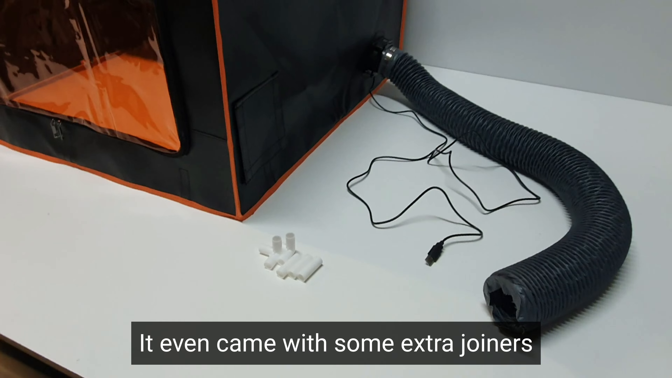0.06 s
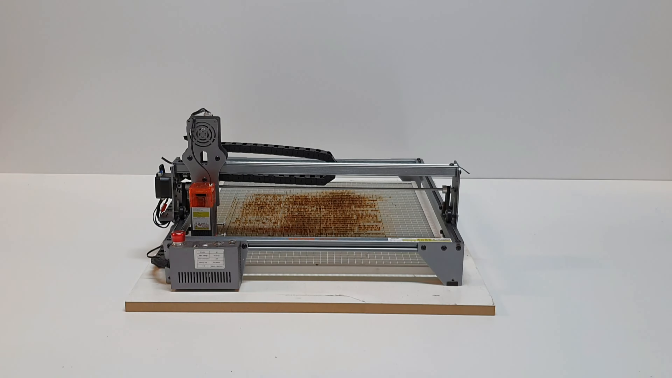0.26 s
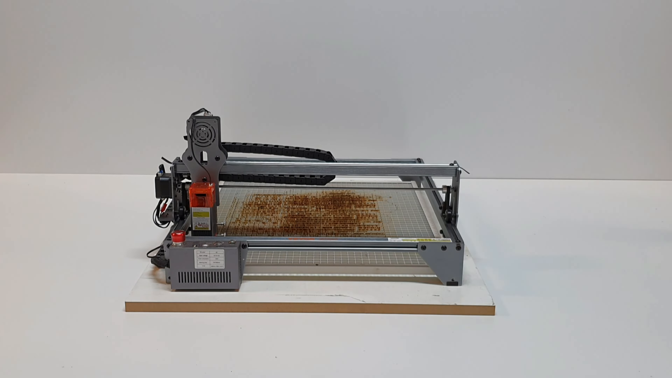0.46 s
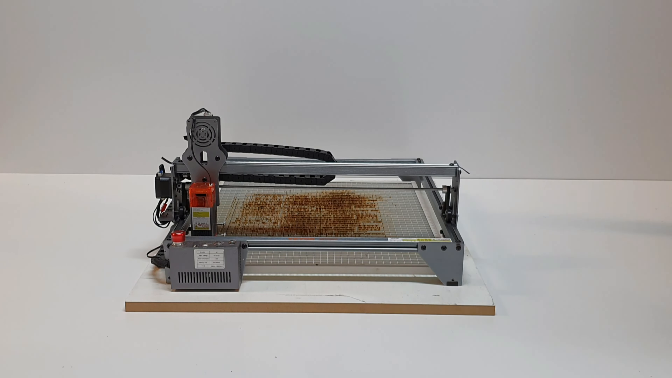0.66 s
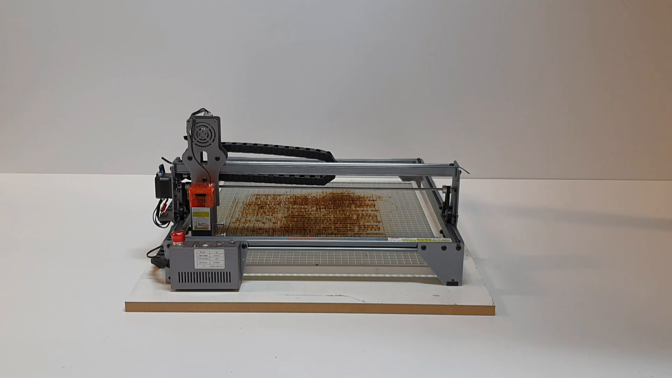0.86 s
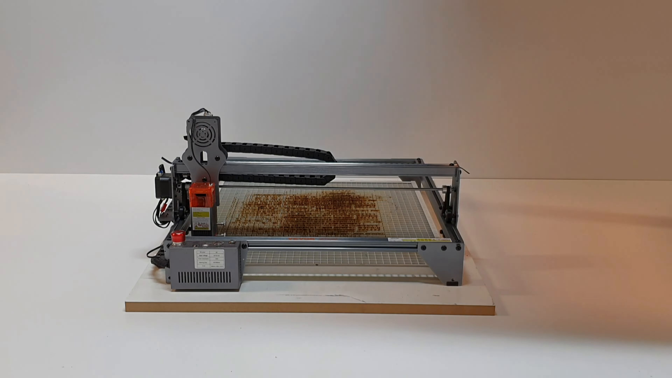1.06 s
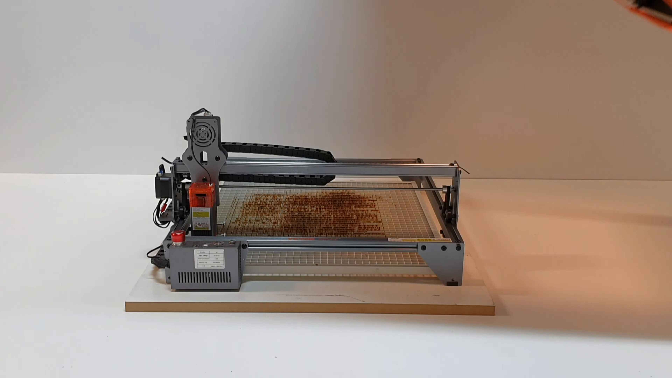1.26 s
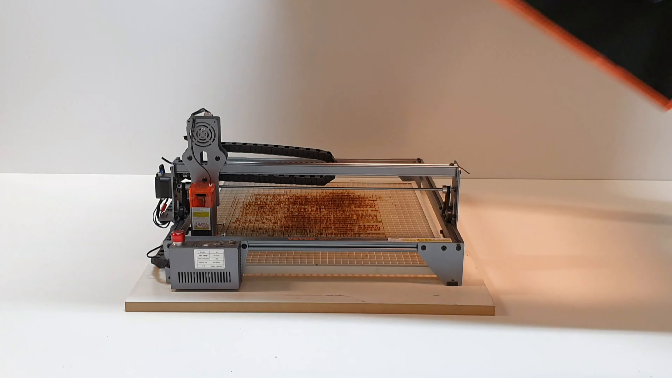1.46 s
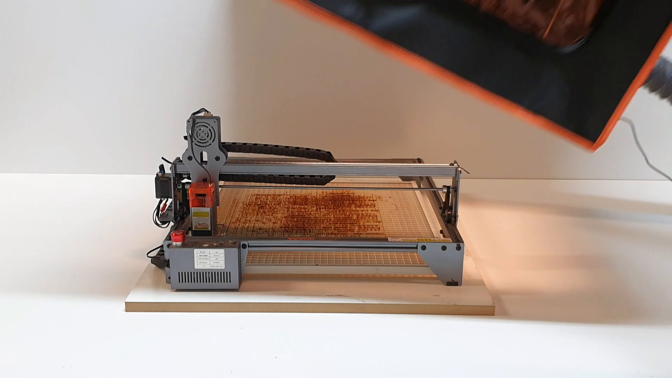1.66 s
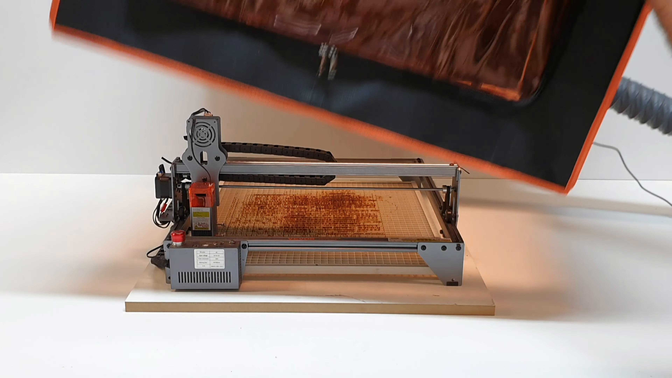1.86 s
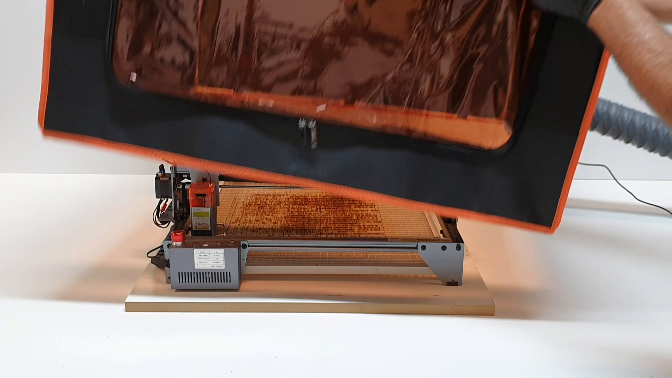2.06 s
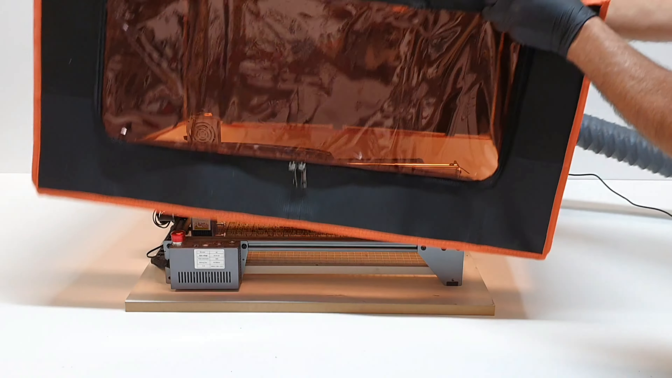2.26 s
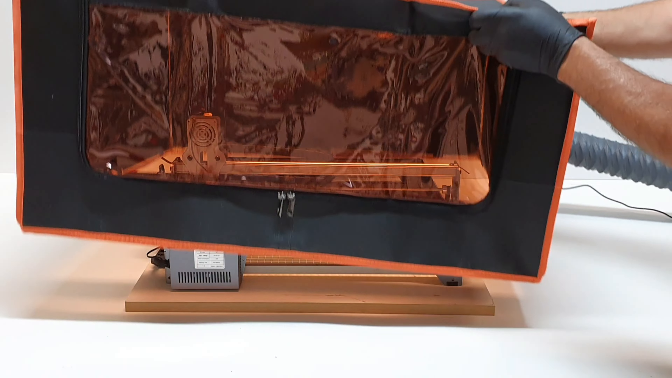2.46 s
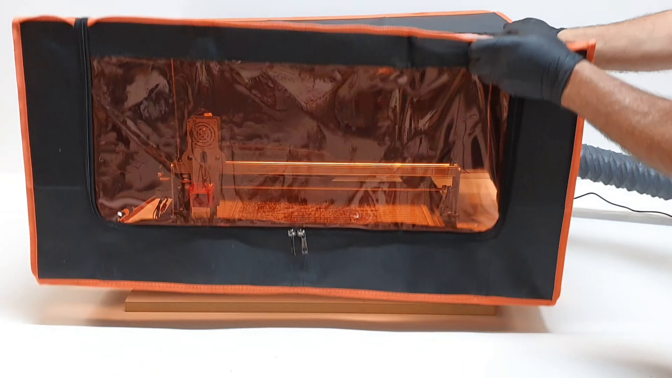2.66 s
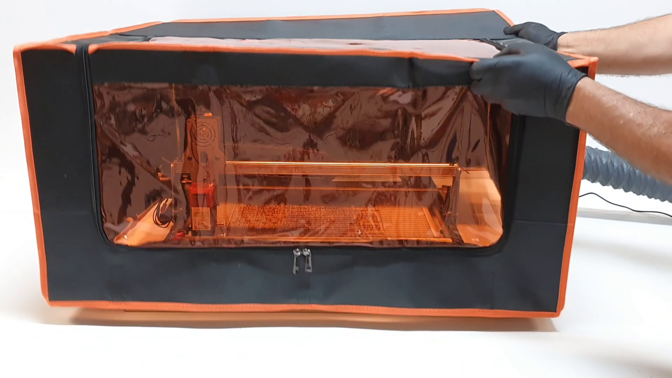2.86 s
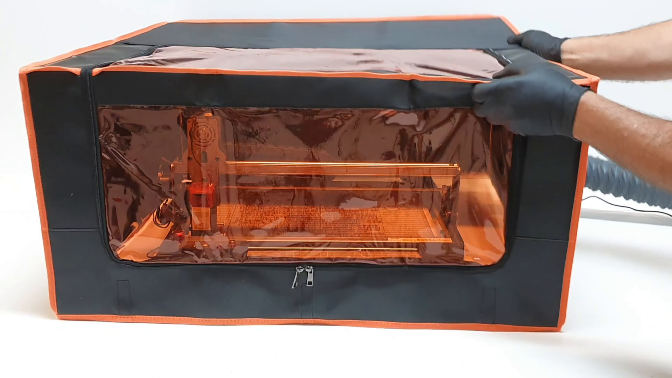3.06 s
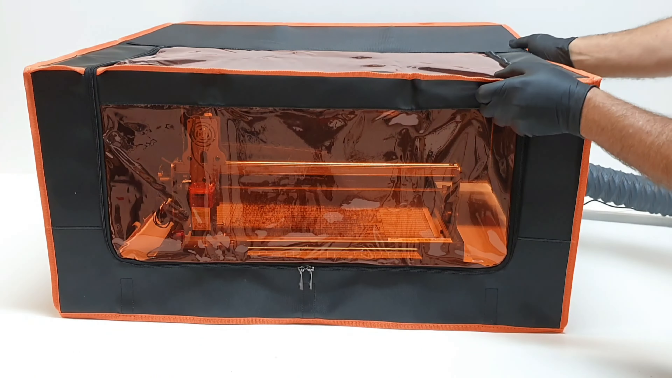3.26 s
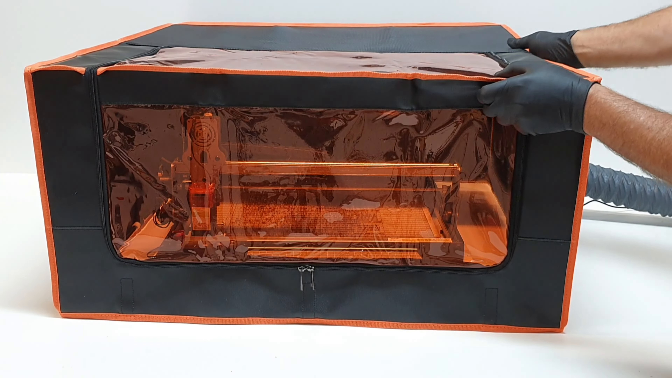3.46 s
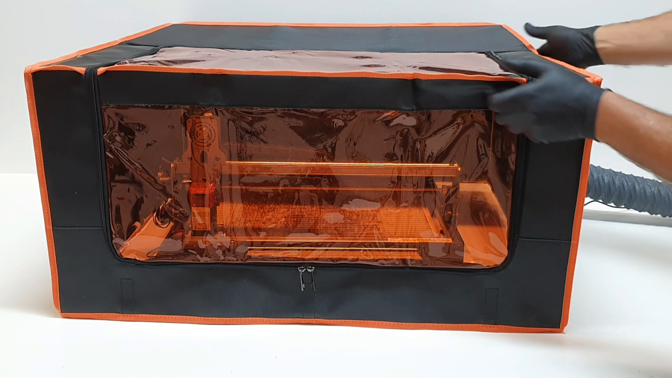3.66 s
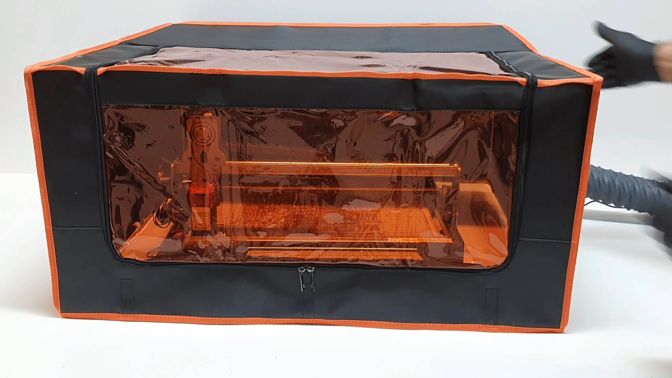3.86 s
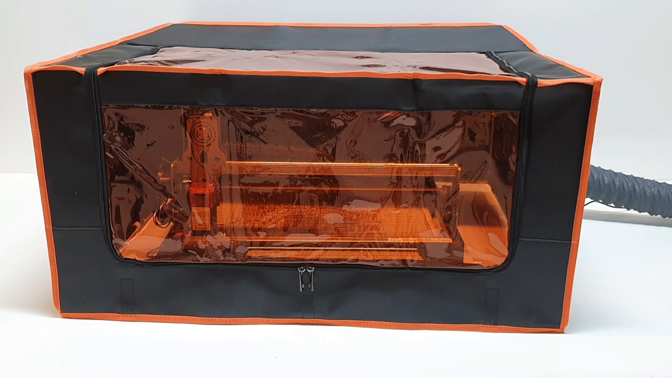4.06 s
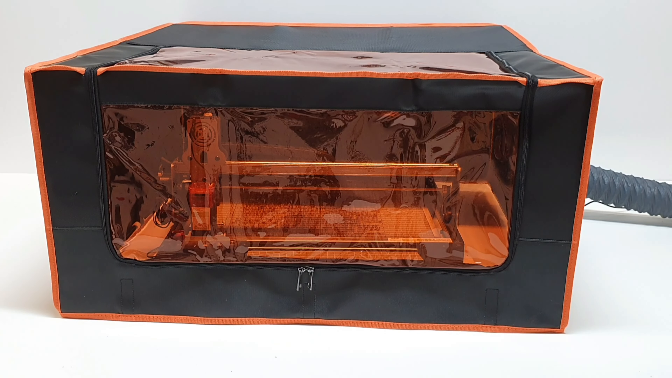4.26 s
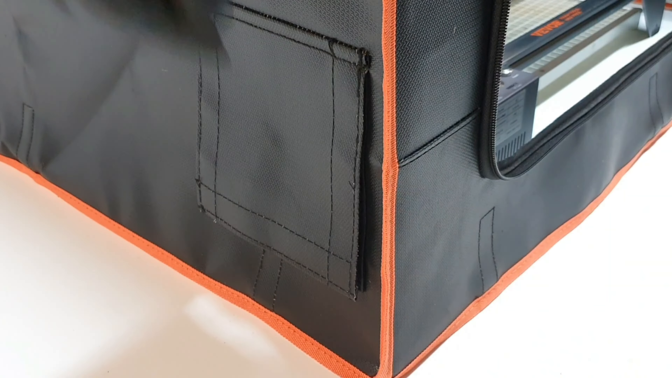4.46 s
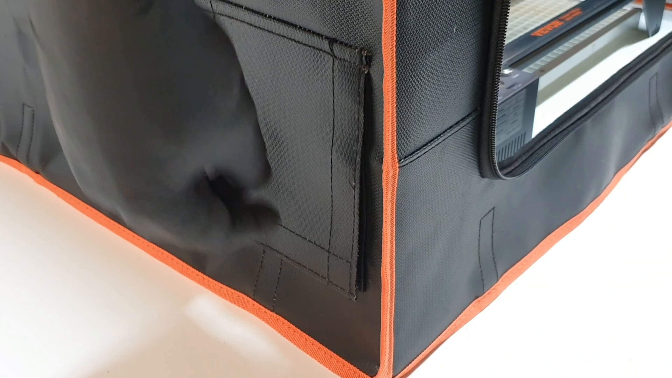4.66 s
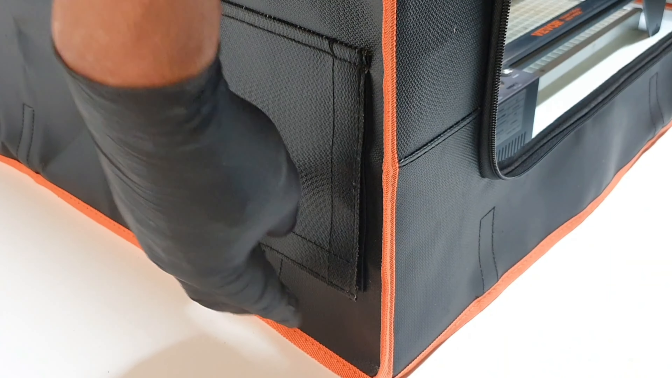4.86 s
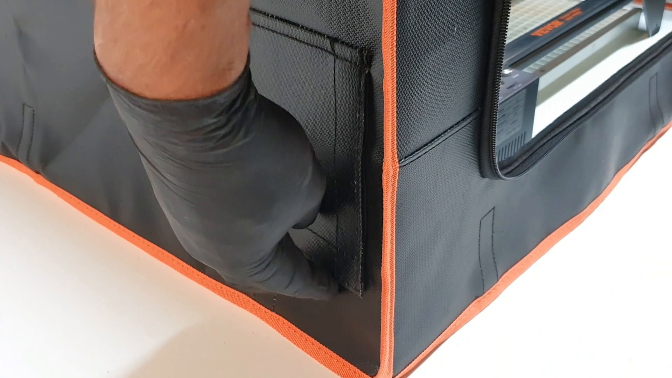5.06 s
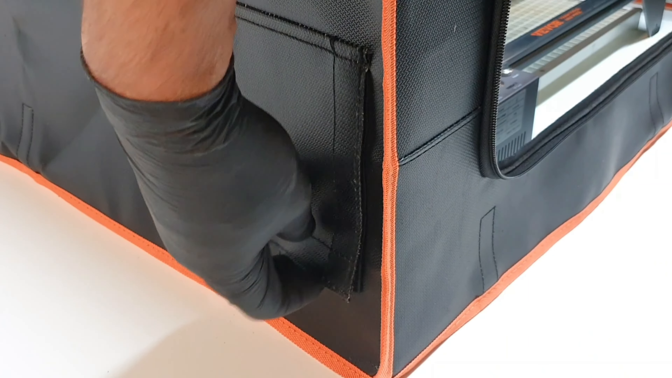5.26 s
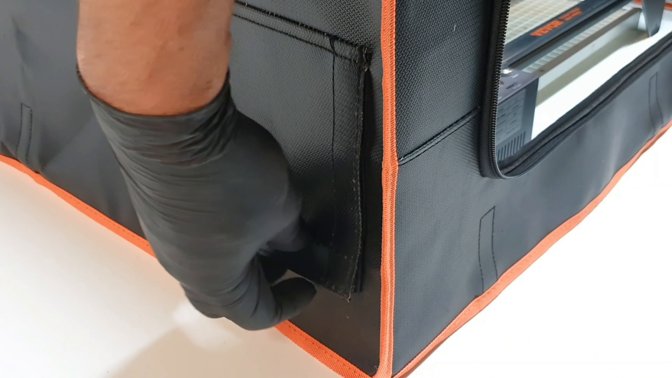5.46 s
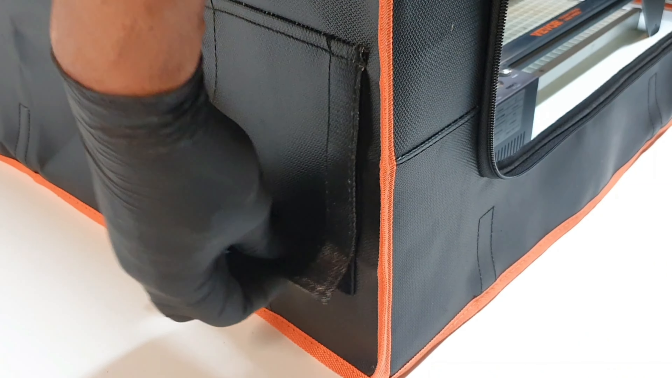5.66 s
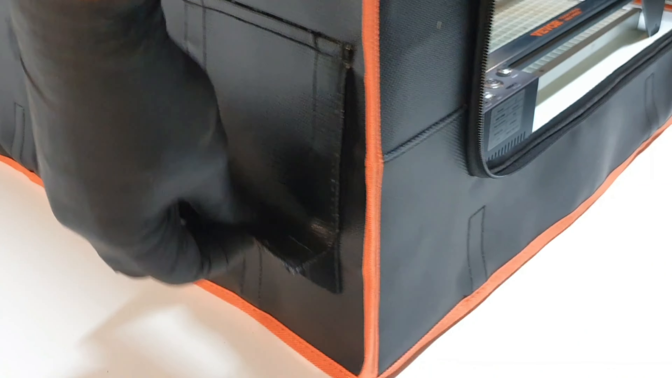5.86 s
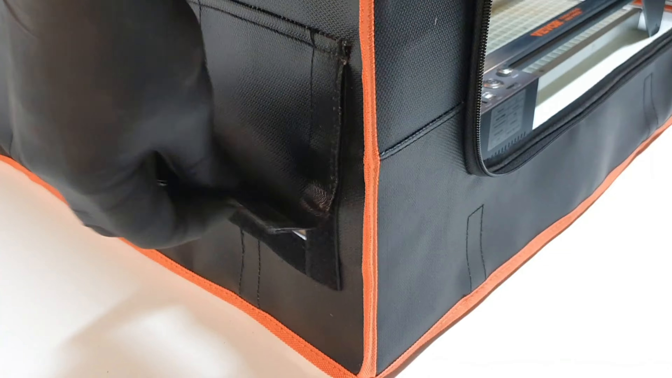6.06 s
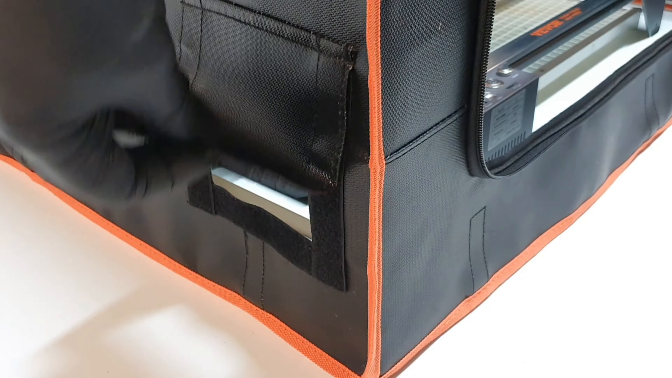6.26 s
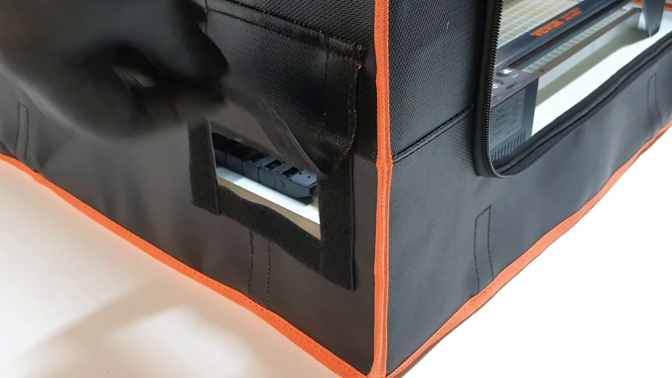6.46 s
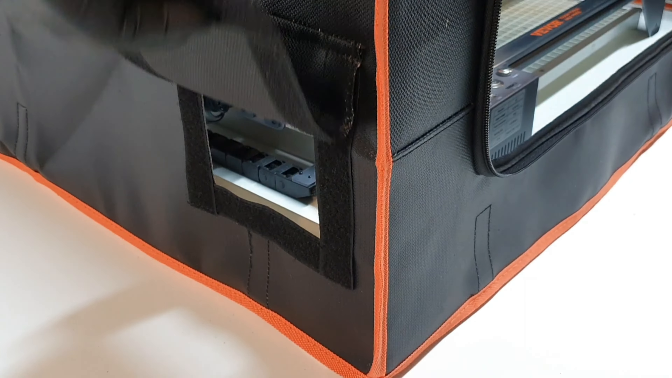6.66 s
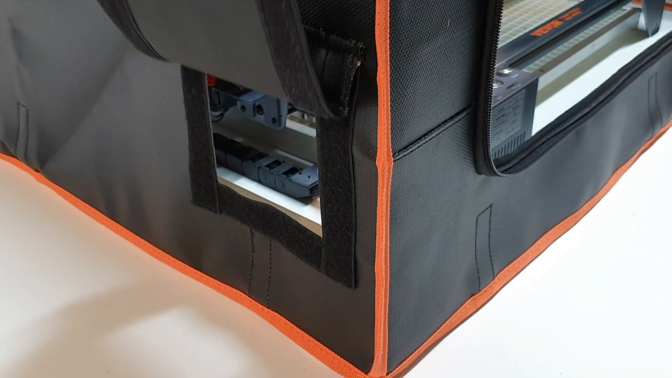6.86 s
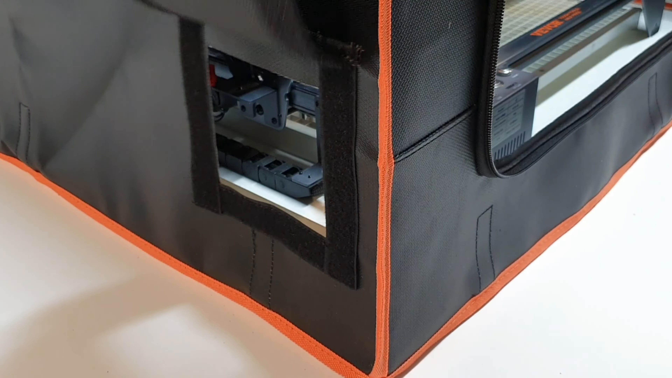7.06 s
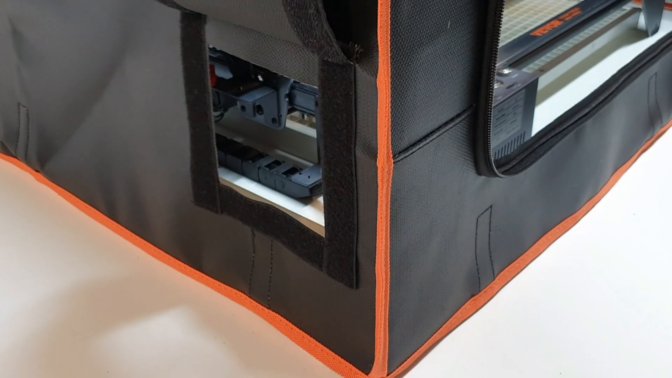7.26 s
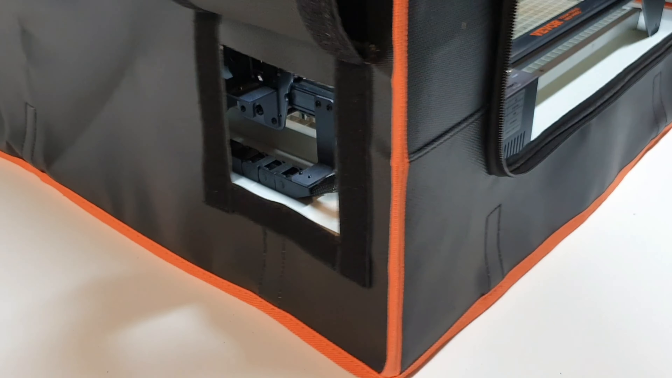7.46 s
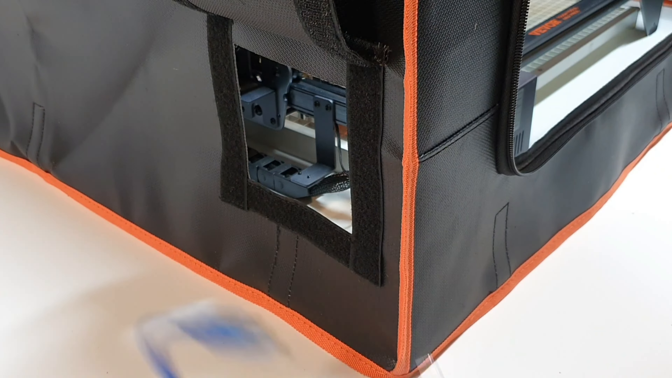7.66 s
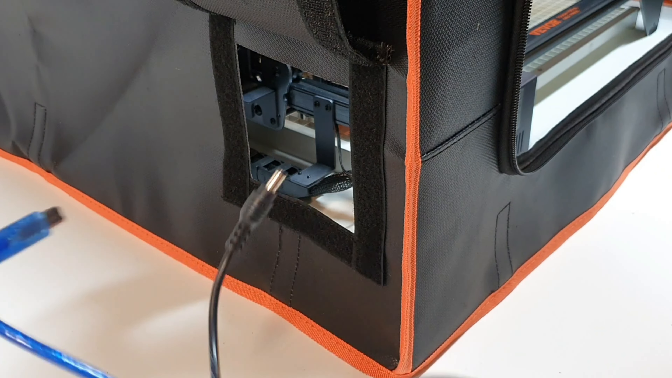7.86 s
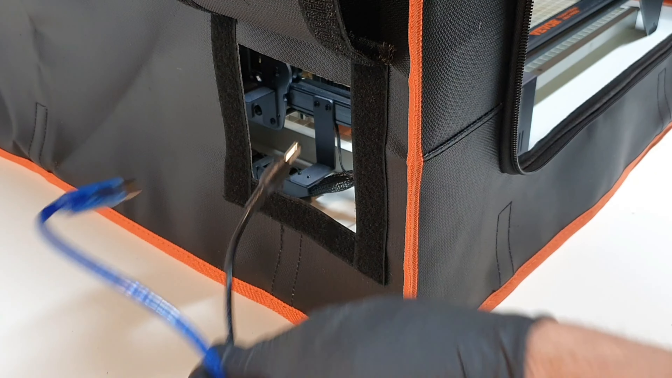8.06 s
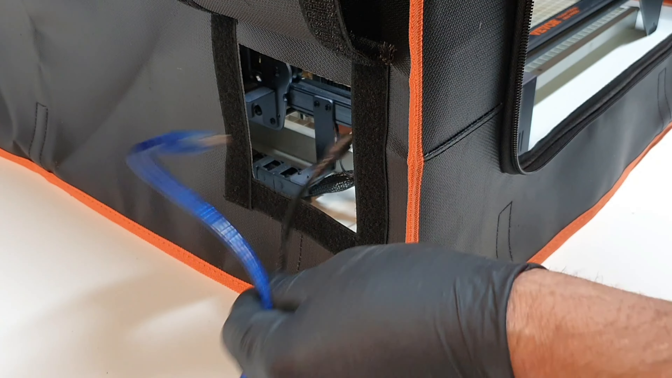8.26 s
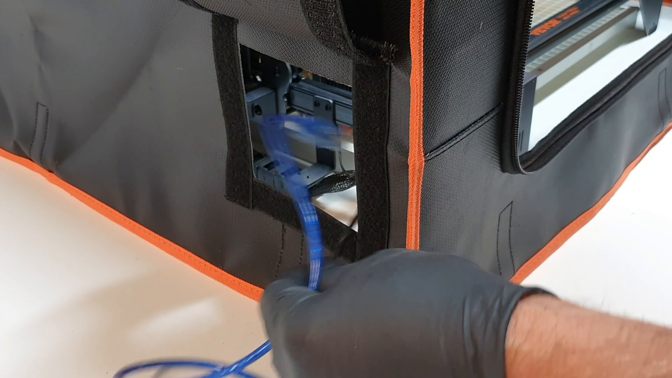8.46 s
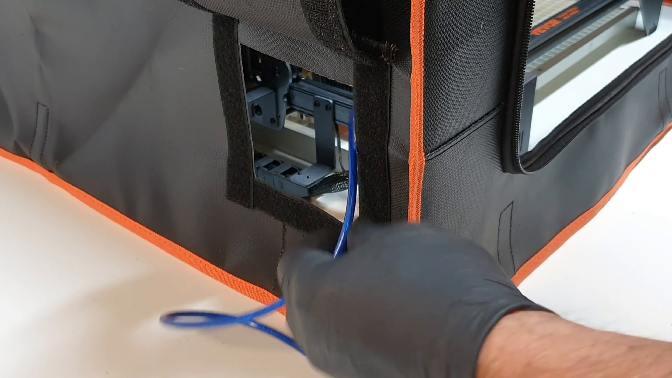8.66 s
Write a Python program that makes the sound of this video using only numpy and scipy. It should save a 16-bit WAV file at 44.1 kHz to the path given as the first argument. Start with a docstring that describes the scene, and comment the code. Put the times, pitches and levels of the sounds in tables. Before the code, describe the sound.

A stiff cloth cover knocks and scuffs quietly into place, a fastened flap tears open in a harsh crackling rip, then cables rub a table.

```python
"""A thin tone over room rumble comes first, then the rustle and knocks of a fabric hood and ribbed hose.
The hood is lifted over a machine and set on a table; a gloved hand peels a hook-and-loop flap; cables slide.
Slipping hooks are short noise bursts, struck parts are decaying modes, and rubbing is flickering noise.
A small quiet room adds a diffuse tail, all heard by a pair of close microphone ports."""
import sys
import numpy as np
from scipy import signal
from scipy.io import wavfile
from scipy.ndimage import uniform_filter1d

SR = 44100
rng = np.random.default_rng(int(sys.argv[2]) if len(sys.argv) > 2 else 0)


def dump(signal):
    """Clip the signal to [-1, 1] and save it as 16-bit WAV at the path in sys.argv[1]."""
    limited = np.clip(np.atleast_2d(signal).T, -1, 1)
    pcm = np.round(limited * 32767).astype(np.int16)
    wavfile.write(sys.argv[1], SR, pcm)


N = 384111

# Large snaps of hooks letting go. Each row: start in seconds, crack level in dB,
# panel thud setting in dB relative to the crack (both shifted by fixed trims).
LARGE_SNAPS = [(5.162, -46, 0), (5.366, -30.5, -9), (5.3958, -25, -8), (5.5177, -23.5, -6.5),
               (5.618, -32, -26), (5.65, -33, -2.5), (5.6628, -6.5, -2), (5.668, -17.5, -2.5),
               (5.6725, -20, -12), (5.6887, -21.5, 3.5), (5.704, -6.5, -1), (5.709, -16, -3.5),
               (5.717, -19, -19), (5.774, -8.5, -19.5), (5.78, -12, 3.5), (5.797, -11, -16),
               (5.817, -16.5, -18.5), (5.8197, -12.5, -2), (5.8284, -14.5, 1), (5.841, -12, -21.5),
               (5.8795, -13.5, -9), (5.8842, -10.5, -1), (5.908, -23, 2.5), (5.9202, -13.5, -10.5),
               (5.994, -19, -10), (6.007, -20.5, -11), (6.011, -13, -23), (6.0196, -13, -1),
               (6.028, -13, 7), (6.035, -16.5, 8.5), (6.0481, -14.5, 0.5), (6.063, -8, -9),
               (6.09, -8.5, -1), (6.109, -11.5, -1.5), (6.121, -16.5, -3.5), (6.1562, -9, -6.5),
               (6.1732, -18, 3.5), (6.1808, -14.5, -1.5), (6.1955, -11.5, 0), (6.2265, -6, -8.5),
               (6.243, -8.5, -3), (6.27, -18, -2), (6.2995, -11, -3), (6.334, -23, -2), (6.3433, -13, -4),
               (6.3576, -9, -1.5), (6.425, -13, -6.5), (6.448, -16, -10.5), (6.498, -22, -12),
               (6.51, -13.5, -14), (6.5182, -15, 0.5), (6.525, -14, -5.5), (6.5631, -7, -17.5),
               (6.575, -14, -5), (6.594, -9, -7), (6.624, -18.5, -29), (6.6466, -10, -8),
               (6.6861, -15, -16), (6.7058, -7, -14.5), (6.743, -11, -33.5), (6.7569, -10, -5.5),
               (6.7788, -19.5, -9.5), (6.7979, -13, -10), (6.8072, -15.5, -13), (6.8189, -10, -7),
               (6.8376, -16.5, 1), (6.842, -10, -9), (6.875, -15, -16.5), (6.885, -14.5, -6),
               (6.9075, -18, -6), (6.9142, -12.5, -9.5), (6.928, -9, -9.5), (6.9501, -12.5, -23.5),
               (6.958, -16, -4.5), (6.9882, -12, -6.5), (6.995, -21, -7.5), (7.0008, -16, -7.5),
               (7.0256, -7.5, -6), (7.0555, -5, -9), (7.077, -11.5, -29), (7.092, -15.5, -18.5),
               (7.137, -21, -26), (7.1476, -10.5, -21), (7.1551, -17, -28), (7.1812, -16, -48)]
# Strokes of cloth on cloth. Each row: start in seconds, hold in seconds, scuff level in dB,
# hiss level in dB, low push level in dB, pitch of the weave in Hz.
CLOTH_STROKES = [(0.154, 0.048, -59.5, -60.5, -91, 1540), (0.401, 0.011, -59, -59.5, -61.5, 2410),
                 (0.504, 0.0094, -53.5, -65, -50.5, 2060), (0.56, 0.1, -57, -61, -55.5, 2040),
                 (0.719, 0.16, -48, -54.5, -46, 1870), (0.969, 0.17, -56, -61, -58.5, 2140),
                 (1.212, 0.034, -62, -68, -57.5, 690), (1.347, 0.13, -54, -59.5, -53, 1700),
                 (1.488, 0.25, -56, -62.5, -54.5, 1300), (2.086, 0.084, -55.5, -53, -45, 2090),
                 (2.262, 0.078, -55, -66, -46.5, 1160), (2.47, 0.02, -57.5, -59.5, -58, 1990),
                 (2.748, 0.068, -59, -67.5, -48.5, 920), (3.01, 0.089, -56.5, -79, -58, 796),
                 (3.066, 0.046, -48.5, -61, -48, 1060), (3.216, 0.053, -54.5, -57.5, -43, 1420),
                 (3.373, 0.027, -66.5, -73, -57, 1520), (4.074, 0.03, -66, -60.5, -87, 1920),
                 (4.338, 0.048, -64, -60, -80, 2000), (4.482, 0.026, -76, -69, -65, 1730),
                 (4.751, 0.02, -61.5, -67.5, -83, 940), (5.125, 0.033, -69, -66, -57, 1000),
                 (5.217, 0.037, -66, -68.5, -61, 895), (5.345, 0.23, -61.5, -63, -56, 1440)]
# Spectrum of scuffed cloth. Each row: frequency in Hz, relative level in dB per Hz.
SCUFF_SPECTRUM = [(300, -23.5), (520, -5), (900, -1), (1450, -1), (1900, 2), (3800, -11), (7000, -53)]
# Spectrum of the fine hiss of cloth. Each row: frequency in Hz, relative level in dB per Hz.
HISS_SPECTRUM = [(1800, -14), (3200, -13.5), (6500, -6.5), (8800, -20), (12500, -15)]
# Coherence of the two ports. Each row: frequency in Hz, left-right likeness from -1 to 1.
LIKENESS = [(60, 0.92), (180, 1), (550, 0.67), (1650, 0.13), (4970, -0.11), (15000, -0.068)]


def gain_of(db):
    """The decibel law: amplitude ratio of a level in dB."""
    return 10 ** (np.asarray(db) / 20)


def evened(x):
    """Normalization to unit root-mean-square."""
    return x / np.sqrt(np.mean(x ** 2) + 1e-20)


def peaked(x):
    """Normalization to unit peak."""
    return x / abs(x).max()


def read(points, hz):
    """Interpolation along a logarithmic frequency axis."""
    f, value = np.transpose(points)
    return np.interp(np.log(hz + 1), np.log(f + 1), value)


def curves(rows):
    """Linear interpolation of the columns over time; -200 outside the rows."""
    s, *columns = np.transpose(rows)
    return [np.interp(np.arange(N) / SR, s, c, left=-200, right=-200) for c in columns]


def add(mix, s, sound, pan_db, lead):
    """Level and arrival-time differences place a sound; the left port hears it lead samples early."""
    for port, side in enumerate((1, -1)):
        first = round(s * SR - side * lead / 2)
        part = mix[port, first:][:len(sound)]
        part += gain_of(side * pan_db / 2) * sound[:len(part)]


def coloured(x, spectrum):
    """Minimum-phase filtering: the phase is the Hilbert transform of the log gain."""
    log_gain = np.log(gain_of(read(spectrum, abs(np.fft.fftfreq(4096, 1 / SR)))))
    response = np.exp(log_gain - 1j * signal.hilbert(log_gain).imag)
    taps = np.fft.ifft(response).real[:2048]
    taps = taps[None] / np.linalg.norm(taps)
    return signal.oaconvolve(np.atleast_2d(x), taps, axes=1)[:, :np.shape(x)[-1]]


def rings(modes, phases, detune=1, size=8000):
    """Modal synthesis: a sum of damped sines, each falling 60 dB in its t60; phases in turns."""
    t = np.arange(size) / SR
    total = 0
    for (hz, db, t60), phase in zip(modes, phases):
        total = total + gain_of(db - 60 * t / t60) * np.sin(2 * np.pi * (hz * detune * t + phase))
    return total


def following(x, hz, width_hz):
    """Heterodyne resonator: shifts the curve hz to zero, low-passes, and shifts back."""
    turn = np.exp(2j * np.pi * np.cumsum(hz) / SR)
    pole = np.exp(-np.pi * width_hz / SR)
    return evened((turn * signal.lfilter([1 - pole], [1, -pole], x / turn)).real)


def woven(x, hz, width_hz, db):
    """Texture pitch: a broad resonance along the curve hz is added to the noise."""
    return evened(x + gain_of(db) * following(x, hz, width_hz))


def noise(spectrum, patchy_db, flicker_db):
    """Random short-time spectra with drifting patches and a flicker shared by all pitches."""
    frames, hz = N // 128 + 9, np.fft.rfftfreq(512, 1 / SR)
    a, b, c, d, patches = rng.standard_normal((frames, 257, 5)).T
    patches = uniform_filter1d(patches, size=6, axis=0)
    patches = evened(uniform_filter1d(patches, size=16, axis=1))
    flicker = evened(uniform_filter1d(rng.standard_normal(frames), size=3))
    same = np.clip(read(LIKENESS, hz), -1, 1)[:, None]
    left = a + 1j * b
    right = same * left + np.sqrt(1 - same ** 2) * (c + 1j * d)
    level_db = read(spectrum, hz)[:, None] + patchy_db * patches + flicker_db * flicker
    z = np.array([left, right]) * gain_of(level_db)
    return evened(signal.istft(z, nperseg=512, noverlap=384)[1][:, :N])


def peeling():
    """Stick-slip release: large snaps, each amid a crackle that swells faintly before it and dies after it."""
    # Tension of the flap, which rings higher when taut.
    # Each row: time in seconds, nominal pitch of its main mode in Hz.
    tautness = [(5.66, 468), (5.78, 294), (5.82, 422), (5.85, 310), (5.885, 603), (6.03, 600), (6.065, 760),
                (6.1, 824), (6.16, 620), (6.245, 494), (6.3, 534), (6.75, 545), (7.2, 469)]
    # Spectrum of the cracks. Each row: frequency in Hz, relative level in dB per Hz.
    crack_spectrum = [(180, -48), (300, -5.5), (567, -9), (923, -9.5), (1330, -5), (3650, -7.5),
                      (6560, -6.5), (8870, -16), (12200, -10.5), (15400, -14.5)]
    peel_start_s, full_run_s = 5.6, 0.45  # the first hooks go singly, then in runs
    base_slip_s, slip_growth = 0.0009, 0.84  # a louder crack is a longer run of hooks
    out, cracks, snaps = np.zeros((2, N)), np.zeros((2, N)), np.zeros(N)
    for s, db, thud_db in LARGE_SNAPS + followers():
        chance = rng.standard_normal(702)
        progress = min((s - peel_start_s) / full_run_s, 1)
        slip_s = np.clip(base_slip_s * progress * gain_of(slip_growth * (db + 12)), 0.00025, 0.003)
        still_held = 0.077 * np.exp(-max(s - 5.8, 0) / 1.0)
        taut_hz = np.interp(s, *np.transpose(tautness))
        crack, thud = snap(db + thud_db - 4.0, still_held, taut_hz, slip_s, chance[2:])
        add(cracks, s, gain_of(db + 5.0) * crack, 1.5 + 2.0 * chance[1], lead=4 + 1.6 * chance[0])
        add(out, s, thud, -0.4, lead=4)  # long waves reach both ports alike
        snaps[round(s * SR)] += gain_of(db)
    after = signal.lfilter([1], [1, -np.exp(-1 / (0.0026 * SR))], snaps)
    # a faint crackle swells just before each snap: a similar decay, reversed in time
    before = signal.lfilter([1], [1, -np.exp(-1 / (0.0024 * SR))], snaps[::-1])[::-1]
    hooks = gain_of(11.0 * np.minimum(rng.exponential(1, N), 1.3))
    hooks = hooks * (rng.random(N) < 1800 / SR) * rng.choice([-1, -1, 1], N)  # 1800 hooks a second
    delay = rng.integers(0, 9, N)
    late = np.zeros(N + 9)
    late[np.arange(N) + delay] = hooks  # each hook reaches the right port 0 to 8 samples later
    crackle = evened(coloured(np.array([hooks, 0.67 * late[:N]]), crack_spectrum))
    crackle_gain = gain_of(-13.5) * after + gain_of(-18.5) * before
    return out + coloured(cracks, crack_spectrum) + crackle_gain * crackle


def followers():
    """Secondary release: one further snap, always much weaker, at a chance delay after each large one."""
    wait, size, thud = rng.exponential(1, (len(LARGE_SNAPS), 3)).T
    s, db, _ = np.transpose(LARGE_SNAPS)
    return list(zip(s + 0.007 * (0.5 + wait), db - 10.5 + (1 - size), -11 + 3.5 * (1 - thud)))


def snap(thud_db, still_held, taut_hz, slip_s, chance):
    """Impulsive release: hooks slip within milliseconds; the flap recoils with a pull of air, barely ringing."""
    # Modes of the flap, all scaled by its tension.
    # Each row: nominal frequency in Hz, nominal level in dB, t60 in seconds.
    flap_modes = [(177, -13.5, 0.032), (490, -7, 0.013), (510, -4.5, 0.021), (696, -8, 0.013),
                  (990, -9.5, 0.005)]
    t = np.arange(2500) / SR
    slip_t = t[:len(chance)]
    slips = np.pad(chance * slip_t * np.exp(-slip_t / slip_s), (0, 300))
    dullness = np.clip(0.028 + 0.5 * chance[-9], 0, 0.85)  # each snap is dulled by a chance amount
    slips = signal.lfilter([1], [1, -dullness], slips)
    # each snap has a broad resonance at a chance pitch
    resonance_hz = np.clip(1700 * np.exp(0.5 * chance[-10]), 700, 9000)
    slips = slips + signal.lfilter(*signal.iirpeak(resonance_hz, 3.5, SR), slips)
    span = taut_hz / flap_modes[2][0] * np.exp(0.1 * chance[-1])
    modes = [(hz, db + 2.4 * c, t60) for (hz, db, t60), c in zip(flap_modes, chance[-8:])]
    thud = -rings(modes, np.zeros(len(flap_modes)), span, size=len(t))
    thud = peaked(signal.lfilter(*signal.butter(1, 150, "high", fs=SR), thud))
    wall_hz = 120 * np.exp(0.33 * chance[-2])  # a flap still held tugs the whole wall
    wall = -np.sin(2 * np.pi * wall_hz * t) * np.exp(-t / 0.0072)
    return slips / np.linalg.norm(slips), gain_of(thud_db) * (thud + still_held * wall)


def knocks():
    """Impact excitation: each bump crumples stiff cloth, rings the hood frame and thumps the panels."""
    # Hood, hose and cable bumping. Each row: start in seconds, crack level in dB, thump level
    # in dB over the crack, crumple level in dB over the crack, thump pitch in Hz.
    bumps = [(0.501, -31, -19, -12, 91.5), (0.586, -28.5, -11.5, -11.5, 96.9),
             (0.641, -29.5, -7, -8.5, 137), (0.715, -21.5, -41, -14, 484), (0.776, -24.5, -26, -14, 498),
             (0.792, -23.5, -10.5, -6, 300), (0.801, -28, -2.5, -8, 165), (0.842, -29, -24, -6.5, 527),
             (0.867, -23.5, -16, -31, 300), (0.878, -29.5, -2.5, -27, 195), (1.01, -26.5, -28, -5.5, 670),
             (1.041, -26.5, -8, -14, 320), (1.36, -26, -1, -12, 125), (1.483, -27, -1.5, -16, 88.8),
             (1.585, -22.5, -3, -22, 88.8), (1.645, -25, 0.5, -30, 100), (2.068, -34, -28, -10, 315),
             (2.103, -37, 1.5, -17, 343), (2.279, -23, -5, -13, 146), (2.297, -26, -2, -42, 83.4),
             (2.743, -43.5, 7, -11, 99.6), (2.806, -47.5, 13.5, -26, 188), (2.847, -42, 0, -7, 347),
             (3.094, -32, 6.5, -5.5, 170), (3.241, -29.5, 6.5, -11, 563), (3.664, -60, 1, -22, 96.9)]
    # Modes of the hood frame. Each row: nominal frequency in Hz, level in dB, t60 in seconds.
    hood_modes = [(1173, -1, 0.011), (1884, -2, 0.012), (2930, -12, 0.0062), (4500, -8, 0.0061)]
    # Modes of the panels. Each row: nominal frequency in Hz, nominal level in dB, t60 in seconds.
    panel_modes = [(98.3, -9, 0.16), (161.3, -1, 0.049), (351, 1.5, 0.035), (531.4, -5.5, 0.061),
                   (733, 3.5, 0.019)]
    out, t = np.zeros((2, N)), np.arange(6000) / SR
    for s, db, thump_db, crumple_db, thump_hz in bumps:
        a, b = rng.standard_normal((2, len(t)))
        chance = rng.random(20)
        blow = (np.exp(-t / 0.0054) + 0.98 * np.exp(-t / 0.0014)) * (1 - np.exp(-t / 0.0018))
        ring = rings(hood_modes, chance, 0.977 + 0.056 * chance[-1], size=len(t))
        ring = signal.oaconvolve(ring, a * blow)[:len(t)]
        # modes near the thump pitch are favoured, by 2.87 dB per octave
        near = [(hz, level - 2.87 * abs(np.log2(hz / thump_hz)), t60) for hz, level, t60 in panel_modes]
        thump = rings(near, 0.35 * chance[10:], 0.886 + 0.22 * chance[-2], size=len(t))
        thump = thump * (1 - np.exp(-t / 0.0011))
        body = 0.28 * peaked(ring) + 0.73 * peaked(coloured(b * blow, SCUFF_SPECTRUM)[0])
        crumple = gain_of(crumple_db) * peaked(coloured(a * blow, HISS_SPECTRUM)[0])
        bump = gain_of(db) * (body + crumple + gain_of(thump_db) * peaked(thump))
        add(out, s, bump, 2 - 6 * chance[-4], lead=-24 * chance[-3])
    return out


def zip_pulls():
    """Free vibration of small metal parts: zip pulls touch once and ring."""
    # Modes of the zip pulls. Each row: frequency in Hz, relative level in dB, t60 in seconds.
    zip_modes = [(6430, 3.5, 0.048), (12400, -2, 0.055), (14010, -11, 0.42)]
    out = np.zeros((2, N))
    add(out, 1.906, gain_of(-56) * rings(zip_modes, np.zeros(9)), 0, 0)
    return out


def touches():
    """Damped resonance after contact: a tick, then a few swings of whatever was tapped."""
    # Short dry taps of fingertips, hose ribs and plugs.
    # Each row: start in seconds, level in dB, main frequency in Hz, t60 in seconds.
    taps = [(2.657, -41.5, 1940, 0.017), (2.848, -32, 1110, 0.0082), (3.095, -27, 895, 0.016),
            (3.196, -27.5, 420, 0.016), (3.2474, -20, 630, 0.013), (4.333, -53, 640, .03),
            (4.762, -47.5, 933, 0.043), (5.013, -56, 1570, 0.038), (8.5648, -33.5, 348, 0.015),
            (8.689, -37, 516, 0.012), (8.6953, -31, 328, 0.012)]
    out, t = np.zeros((2, N)), np.arange(4000) / SR
    for s, db, hz, t60 in taps:
        modes = [(hz, 0, t60), (0.658 * hz, -6, t60), (1.7 * hz, -8, t60 / 2)]
        ring = -rings(modes, np.zeros(3), size=len(t))
        onset = np.minimum(t * hz / 0.35, 1)
        tick = coloured(rng.standard_normal(len(t)) * np.exp(-t / 0.00097), SCUFF_SPECTRUM)[0]
        add(out, s, gain_of(db) * (ring * onset + gain_of(-9.5) * peaked(tick)), 0, 0)
    return out


def rubbing():
    """Sliding friction: weave on weave gives scuff, fine hiss and low push; cables rub the table top."""
    # Cables sliding, with dips in level. Each row: time in seconds, level in dB, scrape pitch in Hz.
    cable_slide = [(7.45, -77, 1510), (7.54, -53.5, 1700), (7.665, -53, 1500), (7.7, -78, 1450),
                   (7.725, -53, 1390), (7.84, -43.5, 1550), (8.05, -53.5, 1410), (8.11, -44.5, 970),
                   (8.2, -45, 1370), (8.44, -53.5, 2380), (8.55, -70.5, 2310), (8.66, -45, 900),
                   (8.71, -48.5, 900)]
    # Spectrum of the table top. Each row: frequency in Hz, relative level in dB per Hz.
    table_spectrum = [(60, -48), (212, -3), (600, 0), (822, -0.5), (1340, -4.5), (1900, -5), (2840, -8),
                      (5000, -25.5), (8000, -61)]
    # Spectrum of the pushed panels. Each row: frequency in Hz, relative level in dB per Hz.
    push_spectrum = [(35, -26), (60, -0.5), (112, -5), (231, -8), (364, -5), (600, -12.5), (1320, -71)]
    scuffing, hissing, pushing = strokes()
    slide_db, scrape_hz = curves(cable_slide)
    scuff = noise(SCUFF_SPECTRUM, patchy_db=1.6, flicker_db=2.2)
    scuff = scuffing * woven(scuff, weave_hz(), width_hz=520, db=1.5)
    hiss = (hissing + gain_of(slide_db - 14.0)) * noise(HISS_SPECTRUM, patchy_db=-5.0, flicker_db=1.0)
    push = pushing * noise(push_spectrum, patchy_db=3, flicker_db=2.2)
    table = noise(table_spectrum, patchy_db=2.2, flicker_db=1.4)
    # the cable skin catches in fine jerks of 40 samples
    grit = gain_of(4.0 * np.minimum(rng.exponential(1, N // 40 + 1), 4)).repeat(40)[:N]
    jerks = evened(grit * rng.standard_normal((2, N)))
    table = evened(table + 0.41 * coloured(jerks, table_spectrum))
    side_db = [[0.8], [-0.8]]
    slide = gain_of(slide_db + side_db) * woven(table, abs(scrape_hz), width_hz=300, db=-5.0)
    return scuff + hiss + push + slide + groan()


def strokes():
    """Incoherent sources add in power: gains of scuff, hiss and push from the rustle and all strokes."""
    rest_db = -78.5, -101.5, -71  # the resting cloth never lies quite still: scuff, hiss, push
    t = np.arange(0, N, 64) / SR
    power = gain_of(rest_db)[:, None] ** 2 * (t < 5.65)
    for start, length, *db, _ in CLOTH_STROKES:
        power = power + gain_of(np.array(db)[:, None] + held(t, start, length)) ** 2
    return [np.interp(np.arange(N) / SR, t, np.sqrt(p)) for p in power]


def held(t, start, length):
    """Exponential envelope, in dB under the top: quick rise up to the start, hold, slower fall."""
    rise_db_s, fall_db_s = 704, 198
    return np.minimum(0, np.minimum(rise_db_s * (t - start), fall_db_s * (start + length - t)))


def weave_hz():
    """Texture pitch over time: that of the latest stroke, taken up 30 ms before its start."""
    start, hz = np.transpose(CLOTH_STROKES)[[0, -1]]
    return hz[np.maximum(np.searchsorted(start - 0.03, np.arange(N) / SR) - 1, 0)]


def groan():
    """Noise-driven resonance: a low rough hum whose lowest band sags and whose upper two stop early."""
    # The groan: start in seconds, hold in seconds, level in dB, then its resonances.
    # Each resonance row: frequency in Hz, width in Hz, relative level in dB.
    start, length, db, (low, *upper) = 4.46, 0.28, -63.5, [(370, 140, 1), (1110, 52, -11.5),
                                        (2150, 70, -13.5)]
    drive, t = rng.standard_normal(N), np.arange(N) / SR
    low_hz = low[0] * (1 - 0.26 * np.clip((t - start) / length, 0, 1))
    hum = following(following(drive, low_hz, low[1]), low_hz, low[1])
    hum = gain_of(low[2] + held(t, start, length)) * hum
    for hz, width, level in upper:
        hum = hum + gain_of(level + held(t, start, 0.17)) * following(drive, np.full(N, hz), width)
    return gain_of(db) * hum


def room(x):
    """Diffuse reverberation: sparse taps of random sign, each band dying at its own speed, alike in the bass."""
    # Decay of the room. Each row: frequency in Hz, t60 in seconds.
    decay = [(100, 0.23), (500, 0.11), (2000, 0.17), (6000, 0.19), (14000, 0.13)]
    out, turn = 0, np.pi * 4.3 * np.arange(N) / SR
    for k in range(3):  # three random tails take turns, so no single pitch rings on in the room
        taps = np.zeros((2, SR // 2))
        jitter = rng.integers(0, 20, (2, (SR // 2 - 91) // 20))
        at = np.arange(90, SR // 2 - 20, 20) + jitter
        np.put_along_axis(taps, at, rng.choice([-1., 1.], at.shape), 1)
        hz, t, z = signal.stft(taps, SR, nperseg=256)
        same = np.clip(read(LIKENESS, hz), -1, 1)[:, None]
        z[1] = same * z[0] + np.sqrt(1 - same ** 2) * z[1]
        tail = signal.istft(z * gain_of(-60 * t / read(decay, hz)[:, None]), SR, nperseg=256)[1]
        tail = tail / np.linalg.norm(tail[0])
        share = np.sqrt(2 / 3) * np.cos(turn + k * np.pi / 3)
        out = out + signal.fftconvolve((share * x.mean(0))[None], tail, axes=1)[:, :N]
    return out


def air():
    """Stationary filtered noise: rumble, stepping down once, and microphone hiss, with a thin sine at first."""
    # Spectrum of the background. Each row: frequency in Hz, relative level in dB per Hz.
    air_spectrum = [(12, -41.5), (20, -6), (71, -4), (200, -16.5), (634, -17), (1050, -22.5), (3830, -30),
                    (6910, -27), (8890, -42), (13600, -28), (15600, -38)]
    # Bass level of the background, which steps down near 4.4 s.
    # Each row: time in seconds, bass gain in dB.
    bass_level = [(0, 8), (4.4, 6), (4.5, 2.5), (8.71, 2.5)]
    tone_hz, tone_db, tone_end_s = 1060, -73, 0.31
    t = np.arange(N) / SR
    fade = np.clip((tone_end_s - t) / 0.018, 0, 1)
    tone = gain_of(tone_db) * np.sin(2 * np.pi * tone_hz * t) * fade
    full = coloured(rng.standard_normal((2, N)), air_spectrum)
    bass = signal.sosfilt(signal.butter(2, 160, fs=SR, output="sos"), full)
    shared_bass = 1.3 * bass[0] + 0.12 * bass  # nearly the same at both ports
    background = evened(full - bass + gain_of(curves(bass_level)[0]) * shared_bass)
    return gain_of(-62) * background + tone


def scene():
    """Superposition: direct sounds, their room tail, the rubbing and the background."""
    bumps = knocks() + zip_pulls()
    flap, taps = peeling(), touches()
    tail = room(gain_of(1.0) * bumps + gain_of(-4.5) * flap + gain_of(-1.5) * taps)
    return bumps + flap + taps + tail + rubbing() + air()


def record(dry):
    """Soft saturation rounds off the sharpest cracks; then a low-pass limits the band."""
    overload = 0.55  # ceiling of the amplitude before the band limit
    rounded = overload * np.tanh(dry / overload)
    low_pass = signal.firwin(511, 16000, window=("kaiser", 9), fs=SR)
    return signal.oaconvolve(rounded, low_pass[None], "same")


dry = scene()
out = record(dry)
dump(out)
```